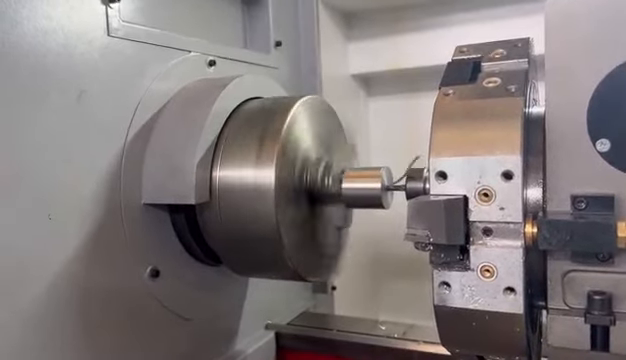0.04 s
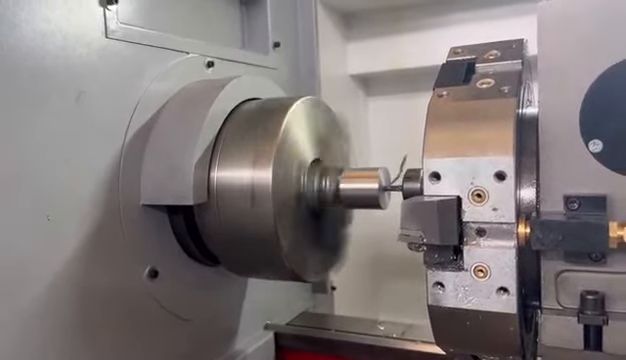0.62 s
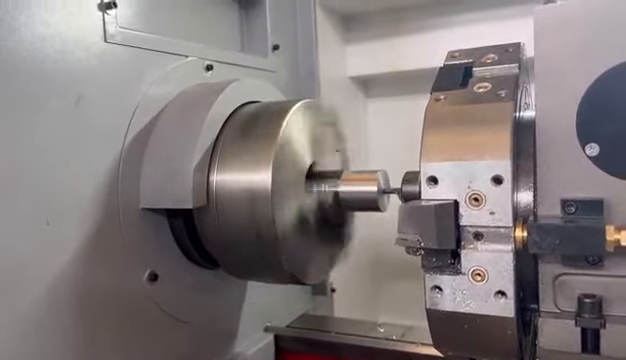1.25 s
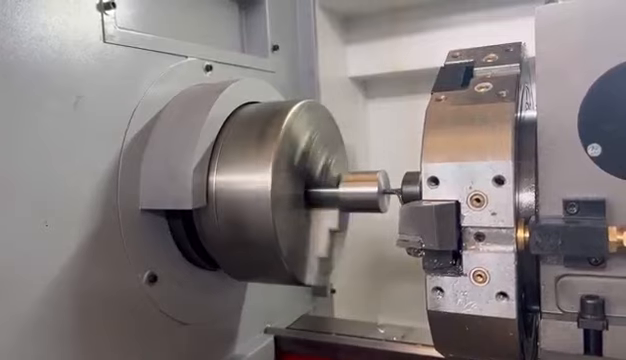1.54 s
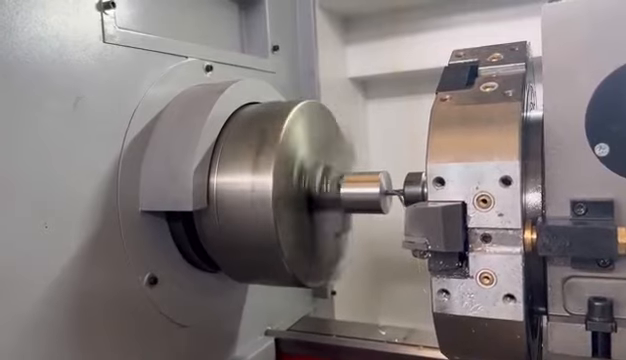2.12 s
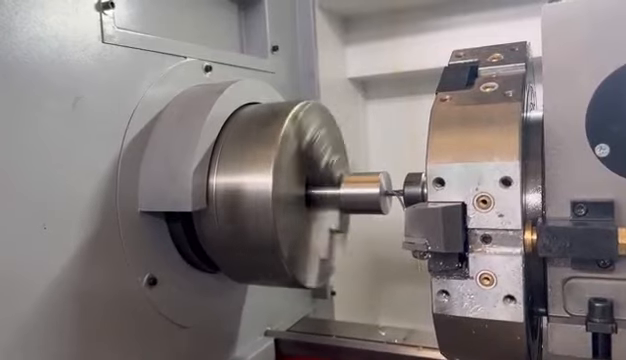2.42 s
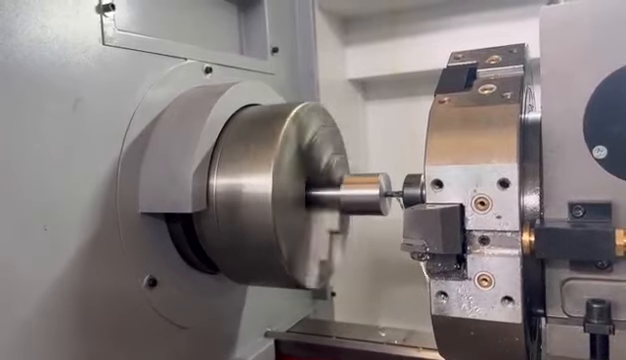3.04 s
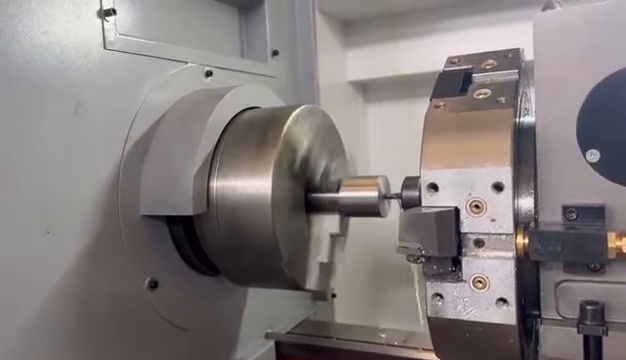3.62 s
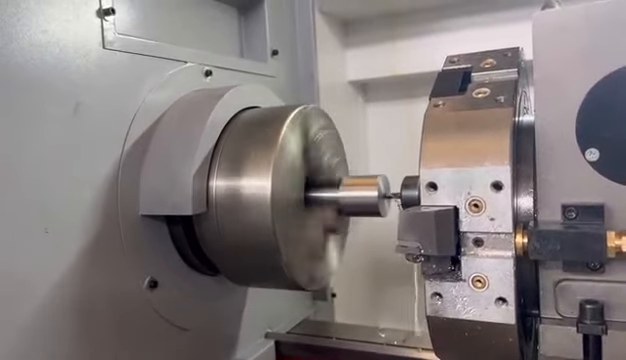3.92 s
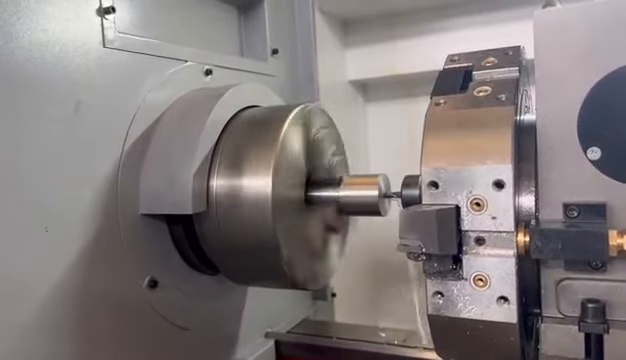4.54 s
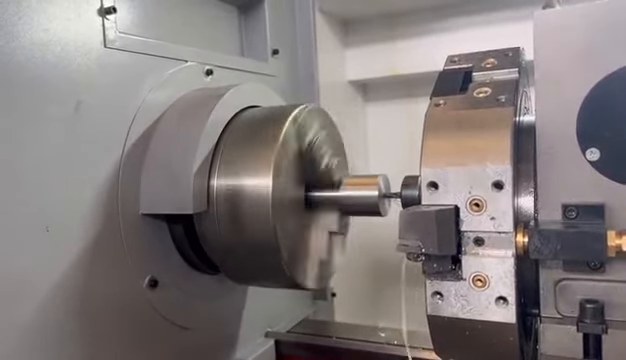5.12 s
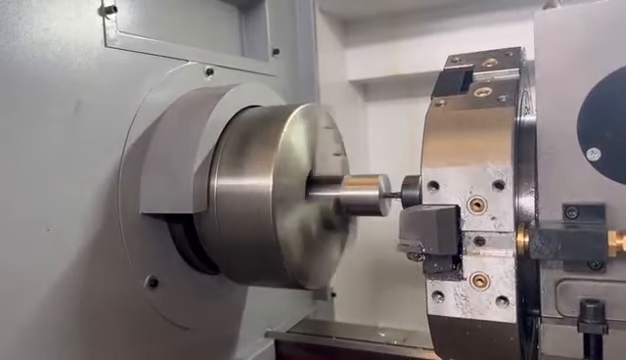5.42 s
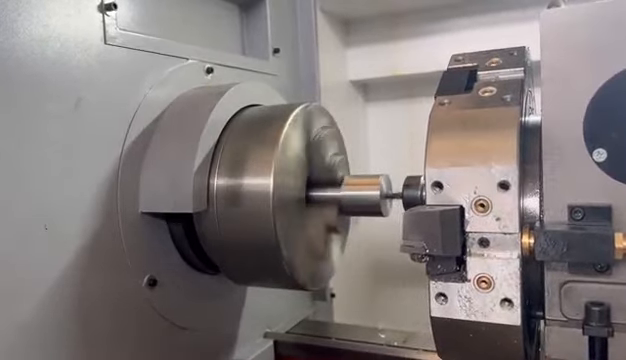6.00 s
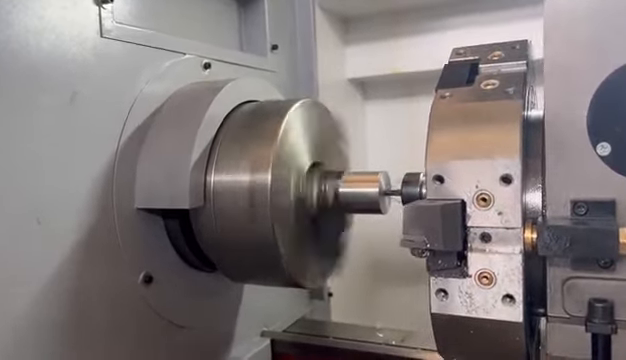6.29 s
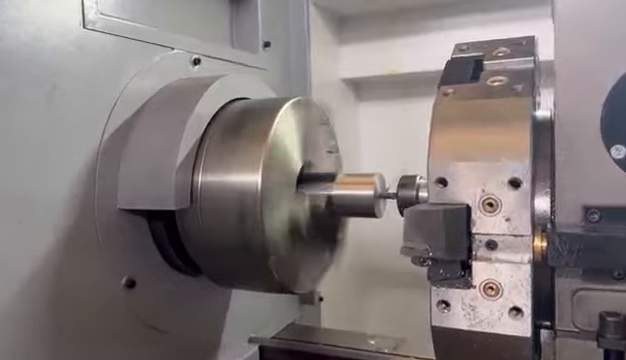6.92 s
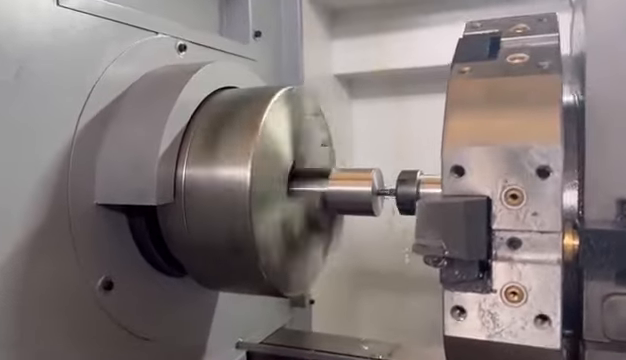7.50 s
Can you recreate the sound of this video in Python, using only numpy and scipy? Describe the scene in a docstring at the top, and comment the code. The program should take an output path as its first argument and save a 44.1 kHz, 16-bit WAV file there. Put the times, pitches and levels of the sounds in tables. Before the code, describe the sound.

Close, steady whine of a running lathe, with a rapid growling churn, a thin high motor whistle and a rush of fans.

```python
"""A lathe's toothed belt whines and whirs as it drives the spindle at about 500 rpm, heard from close by.
The pattern repeats each spindle turn and each belt lap; tight spots make the sheet-metal housing growl.
The inverter sings in the motor windings near 6 kHz. Fans and pumps hum over a steady rush behind it,
and a low throb of the machine body swells for a few seconds in the middle."""
import sys
import numpy as np
from scipy import signal
from scipy.fft import rfft, irfft
from scipy.io import wavfile
from scipy.ndimage import uniform_filter1d

SR = 44100
rng = np.random.default_rng(int(sys.argv[2]) if len(sys.argv) > 2 else 0)


def generate_wav(signal):
    """Clip the signal to [-1, 1] and save it as 16-bit WAV at the path in sys.argv[1]."""
    frames = np.transpose(np.atleast_2d(signal))
    scaled = np.clip(frames, -1, 1) * 32767
    pcm = np.round(scaled).astype(np.int16)
    wavfile.write(sys.argv[1], SR, pcm)


N = 341775
TIME = np.arange(N) / SR

SPIN_HZ, TEETH, BELT_LAP_HZ = 8.4101, 110, 2.182
RING_MULTIPLE = 3  # of half the mesh rate

# Swell of the ring above the whine. Each row: time in seconds, level in dB (used about its mean).
RING_LEVEL_DB = [(0, -47), (.9, -43.5), (1.7, -44.5), (3.3, -45.5), (3.95, -44), (4.25, -42.5),
                 (4.75, -44.5), (5.1, -45), (5.7, -45), (6.2, -42.5), (6.7, -39), (7.03, -41.5), (7.3, -38),
                 (7.75, -40)]


def whine(turns, gain_db=0.71, flaw_at_turns=0.6, sway=0.033, sway_at_turns=0.091, stray_db=-41):
    """The tooth mesh sags at one uneven spot each turn and eases twice in each lap of the belt."""
    # The microphone drifts through standing waves.
    # Each row: time in seconds, left and right level in dB before gain_db, left phase lead in rad.
    standing_waves = [(0, -18.5, -37, 2.5), (1.8, -18.5, -34.5, 4), (2.5, -19.5, -38, 0),
                      (3.6, -19, -39.5, 5), (5.5, -18.5, -32.5, 2.1), (6.2, -19.5, -38, 1),
                      (6.9, -22, -42, -2), (7.5, -21, -26.5, -0.5), (7.75, -24.5, -24.5, -0.5)]
    # The belt's stiff stretch rounds each pulley. Each row: place in laps, length in laps, easing depth.
    pulleys = [(.25, 0.21, 0.12), (.84, 0.21, 0.043)]
    # Brief level changes, mostly dips. Each row: centre in seconds, length in seconds, gain in dB.
    dips = [(3.8, 0.25, -3), (4.758, 0.36, -2), (6.972, 0.12, 0.5)]
    sag_turns, recover_turns, sag_depth, lurch_rad = .026, .014, .15, .12
    past_turns = offset(turns, flaw_at_turns)
    flaw = np.exp(-(past_turns / np.where(past_turns < 0, sag_turns, recover_turns)) ** 2)
    flaw *= 1 + 0.13 * drift(rate_hz=6.8)
    cycles = TEETH * turns + (belt_slip_rad() + lurch_rad * flaw) / (2 * np.pi)
    mesh = tone(cycles, *(curve(standing_waves, column) for column in (1, 2, 3)))
    easing = sum(depth * passing(BELT_LAP_HZ * TIME, at, length) for at, length, depth in pulleys)
    belt_ripple = (easing - easing.mean()) * mesh[0]  # same at both ears
    reflections = np.array([drift(rate_hz=3.3) + 1j * drift(rate_hz=3.2) for ear in range(2)])
    stray = reflections * tone(cycles, stray_db, stray_db, lead_rad=0) / np.sqrt(2)
    per_turn = (1 - sag_depth * flaw) * (1 + sway * np.cos(2 * np.pi * (turns - sway_at_turns)))
    dip_db = sum(db * bump(at_s, length_s) for at_s, length_s, db in dips)
    return gain_of(gain_db + dip_db) * per_turn * (mesh - belt_ripple + stray).real


def belt_slip_rad(depth_rad=0.15, at_laps=0.21, length_laps=0.44):
    """The stiff stretch of the belt pulls the mesh slightly ahead once a lap."""
    return depth_rad * passing(BELT_LAP_HZ * TIME, at_laps, length_laps)


def ring(turns, warble_rad=.8, warble_at_turns=.85, steadying_rad_per_db=.08):
    """A fifth above the whine, the mesh throbs with the chuck; it warbles less as it grows louder."""
    depth_rad = warble_rad - steadying_rad_per_db * swing_db(RING_LEVEL_DB)
    warble = depth_rad * np.cos(2 * np.pi * (turns - warble_at_turns))
    cycles = RING_MULTIPLE * TEETH / 2 * turns + (warble + 2 * belt_slip_rad()) / (2 * np.pi)
    partial = tone(cycles, left_db=-41, right_db=-43.5, lead_rad=1.51)
    return (partial * ring_swell(turns) * fading(share=.14, rate_hz=8)).real


def ring_swell(turns, gain_db=2.5, beat_db=1.5, loudest_at_turns=0.22):
    """Gain of the ring: it drops briefly once a turn and beats on every second turn."""
    db = gain_db + swing_db(RING_LEVEL_DB) + beat_db * np.cos(np.pi * (turns - loudest_at_turns))
    return gain_of(db) * (1 - .85 * passing(turns, at=.645, length=.25))


def overtones(turns):
    """Higher mesh partials, chopped and warbled by the chuck; the ring's octave follows the ring."""
    # Each row: multiple of half the mesh rate, left and right base level in dB,
    # left phase lead in rad, warble depth in rad.
    mesh_partials = [(4, -46.5, -47, -2.5, .25), (6, -56, -58.5, 1.85, 0.69), (7, -61, -66, 2, 1.1),
                     (8, -56.5, -58.5, 2, 1.1), (9, -63.5, -61, -0.8, 1), (10, -63, -70, 5, 1)]
    # The others recede as the microphone leans in. Each row: time in seconds, gain in dB.
    recession = [(0, 0.5), (3, 0), (6.2, -1.5), (7, -2.5), (7.75, -3)]
    slip_cycles = belt_slip_rad() / np.pi
    ringing, receding = ring_swell(turns), gain_of(curve(recession))
    out = np.zeros((2, N))
    for multiple, *ears, warble_rad in mesh_partials:
        scatter = chopping(turns, depth=.04 * multiple) * fading(share=.06 * multiple, rate_hz=18)
        warble = np.exp(1j * warble_rad * np.sin(2 * np.pi * (turns + rng.random())))
        partial = tone(multiple * TEETH / 2 * turns + slip_cycles, *ears) * scatter * warble
        out += (partial * (ringing if multiple == 2 * RING_MULTIPLE else receding)).real
    return out


def chopping(turns, depth, count=4):
    """The passing jaws scatter a tone in the same way on every turn."""
    ripple = np.exp(2j * np.pi * rng.random((2, count))) * (np.arange(count) > 0)
    level, phase = (unit_rms(each_turn(turns, row).real) for row in ripple)
    return (2 + depth * (level + 1j * phase)) / np.sqrt(1 + 2 * depth ** 2)


def growls(turns):
    """Tight spots in the drive set the housing ringing on every turn, never twice quite alike."""
    # Each row: angle in turns, pitch in Hz, glide in Hz per turn, length in turns,
    # left and right base level in dB, left phase lead in rad.
    tight_spots = [(0.076, 674, 330, 0.25, -31, -34, .77), (.47, 711, -450, .18, -29.5, -33, 1),
                   (0.608, 842.4, 0, 0.37, -33, -32.5, 1), (0.614, 780, 0, 0.021, -18.5, -28, 0.65),
                   (.62, 1117, 300, .16, -41, -49, 1), (.71, 800, 0, 0.1, -32, -41, .8),
                   (.85, 763, 0, 0.16, -40.5, -37, 0.72)]
    out = np.zeros((2, N))
    for angle, hz, glide, length, *ears in tight_spots:
        past_turns = offset(turns, angle)
        cycles = (hz + glide * past_turns / 2) * past_turns / SPIN_HZ + TEETH * angle + .5
        ringing = tone(cycles, *ears) * fading(share=.22, rate_hz=25)
        out += ringing.real * passing(turns, angle, length)
    return out


def whir(turns, right_bed_db=-1.0, scatter_db=2.5, count=360):
    """Small errors from tooth to tooth repeat every turn: a dense comb of partials."""
    # Each row: multiple of spindle speed, left and right base level in dB, left phase lead in rad.
    strong_partials = [(10, -54, -54, 0), (43, -50, -50, .3), (47, -52, -62, .1), (57, -55, -51, 1),
                       (61, -51, -51, .8), (79, -52, -55, .2), (86, -51, -51, 1), (90, -48, -40.3, -.3),
                       (91, -51, -58, .1), (109, -55, -43, 1.8)]
    # Weaker partials between them. Each row: frequency in Hz, base level per partial in dB.
    bed = [(60, -78), (300, -58.5), (450, -51), (570, -57), (700, -63), (860, -65), (925, -54.5),
           (990, -54), (1200, -63), (1600, -63.5), (3000, -73.5)]
    hz = np.arange(count) * SPIN_HZ
    bed_db = spectrum(bed, hz) + scatter_db * rng.standard_normal((2, count))
    bed_db[1] += right_bed_db
    partials = gain_of(bed_db) * np.exp(2j * np.pi * rng.random((2, count)))
    partials[:, hz < bed[0][0]] = 0
    for order, left_db, right_db, lead_rad in strong_partials:
        phase_rad = 2 * np.pi * rng.random() + np.array([lead_rad, 0])
        partials[:, order] = gain_of([left_db, right_db]) * np.exp(1j * phase_rad)
    comb = np.array([each_turn(turns, ear) for ear in partials])
    return np.sqrt(2) * (comb * fading(share=0.34, rate_hz=6.9)).real


def drone(turns):
    """Two low partials of the whir stand in the enclosure and grow as the microphone leans in."""
    # Each row: multiple of spindle speed, left and right base level in dB, left phase lead in rad.
    partials = [(75, -48, -51, .5), (90, -52, -48, -.3)]
    # Each row: time in seconds, gain in dB.
    swell = [(0, -4), (4.6, -18), (6, -5), (7.4, 9)]
    wave = sum(tone(order * turns + rng.random(), *ears) * fading(share=0.22, rate_hz=5.4)
               for order, *ears in partials)
    return gain_of(curve(swell)) * wave.real


def inverter(carrier_hz=6000.2, supply_hz=28.68, gain_db=-1.0):
    """The motor windings sing at sidebands of the switching frequency; the strongest take turns."""
    # Each row: offset in multiples of supply_hz, left and right base level in dB, left phase lead in rad.
    sidebands = [(-11, -61, -68, 1), (-5, -56, -60, 1), (-3, -60.5, -57.5, -1), (-1, -52, -50.5, -.7),
                 (1, -51.5, -54, -.7), (3, -58, -58, -1), (5, -57, -60, .4), (7, -64, -69, .9)]
    # Each row: time in seconds, levels of sidebands -1 and +1 in dB (used about their means).
    inner_levels = [(0, -53, -51), (.9, -57, -57), (1.6, -58, -53), (2.35, -48.5, -54), (3.0, -47, -55),
                    (3.6, -54, -60), (4.25, -52, -54), (4.6, -55, -47), (5.2, -56, -47), (5.5, -52, -52),
                    (6.1, -51, -48), (6.65, -47, -54), (6.95, -52.5, -53), (7.15, -47, -52),
                    (7.75, -48, -55)]
    # Each row: time in seconds, level of sideband +3 in dB (used about its mean).
    upper_level = [(0, -53), (1.05, -52), (1.6, -55), (6.4, -60), (6.8, -48), (7.05, -52), (7.45, -50),
                   (7.75, -51)]
    own_db = {1: swing_db(inner_levels, column=2), 3: swing_db(upper_level)}
    out = np.zeros((2, N))
    for k, *ears in sidebands:
        cycles = (carrier_hz + k * supply_hz) * TIME + k ** 2 / 42  # staggered phases
        db = own_db.get(k, swing_db(inner_levels) / np.sqrt(abs(k)))
        out += gain_of(db) * (tone(cycles, *ears) * fading(share=.14, rate_hz=7)).real
    return gain_of(gain_db) * out


def whistle(hz=5631.3, beat_hz=3.82, beat_at_s=2.45, beat_share=.45):
    """Two thin electronic tones just under the inverter's song beat slowly against each other."""
    # Each row: time in seconds, gain in dB.
    swell = [(0, 10), (2.7, 10.5), (4.9, 4.5), (7.75, 9)]
    beat = 1 + beat_share * np.exp(-2j * np.pi * beat_hz * (TIME - beat_at_s))
    pair = tone(hz * TIME, left_db=-55.5, right_db=-60.0, lead_rad=2.4) * beat
    return gain_of(curve(swell)) * (pair * fading(share=.16, rate_hz=9.8)).real


def throb(hz=65.6, idle_db=-54, held_db=-50.5, surge_gain_db=2, stretch=1.1):
    """A low vibration of the machine body builds up from a faint idle, surges unevenly and dies away."""
    # Each row: start in seconds, length in seconds before stretch, level in dB before surge_gain_db.
    surges = [(1.46, .135, -38), (1.755, .06, -41.5), (1.955, .125, -38), (2.185, .11, -36.3),
              (2.37, .08, -42.5), (2.556, .17, -39), (2.82, .08, -45.5), (2.975, .23, -38.3),
              (3.25, .08, -43), (3.356, .25, -38.7), (3.86, .21, -42.5), (4.245, .115, -38),
              (4.62, .09, -44.5)]
    # Brief stalls. Each row: centre in seconds, length in seconds, gain in dB.
    lulls = [(3.718, 0.11, -18), (4.8, .1, -10)]
    start_s, end_s, fade_s = 1.1, 4.6, 0.4
    cycles = hz * TIME + 0.13 * drift(rate_hz=1.5)
    held = np.clip(np.minimum(TIME - start_s, end_s - TIME) / fade_s + .5, 0, 1)
    bed = (gain_of(idle_db) + gain_of(held_db) * held) * abs(fading(share=0.25, rate_hz=7.2))
    surging = sum(gain_of(db + surge_gain_db) * bump(at_s + length_s / 2, stretch * length_s)
                  for at_s, length_s, db in surges)
    stall = gain_of(sum(db * bump(at_s, length_s) for at_s, length_s, db in lulls))
    return np.sqrt(2) * np.hypot(bed, surging) * stall * np.sin(2 * np.pi * cycles)


def pump(hz=461.22, beat_at_s=.59, beat_share=0.34):
    """The pump's hum beats slowly against the drive's partial at half the mesh rate."""
    # Each row: time in seconds, gain in dB.
    swell = [(0, 2), (1.35, 2), (2.2, 1), (3.65, 0), (4.3, 0.5), (5.1, 1.5), (5.7, -1), (6.6, -0.5),
             (7.6, -0.5)]
    beat_hz = TEETH / 2 * SPIN_HZ - hz
    beat = 1 + beat_share * np.exp(2j * np.pi * beat_hz * (TIME - beat_at_s))
    hum = tone(hz * TIME + 0.12 * drift(rate_hz=0.71), left_db=-46.0, right_db=-40.5, lead_rad=0)
    return gain_of(curve(swell)) * (hum * beat).real


def hums():
    """Fans, pumps and electronics hum at their own pitches, each tone wavering a little."""
    # Each row: frequency in Hz, left and right level in dB, left phase lead in rad.
    tones = [(82.8, -56, -56, 0), (240.2, -53, -53, -.2), (246.5, -54, -55, 0), (300, -55, -54, .3),
             (302.5, -55, -53, 0), (329.3, -55, -51, .6), (386, -50.5, -50, .5), (470.8, -56, -52, 1),
             (527.2, -40.5, -51.5, -.1), (1251, -52, -56, 2), (2261, -60, -63, -3), (3343.4, -59, -63, 2.8),
             (5168, -61, -68, -.5), (5799.5, -58, -68, -1.5), (6369.5, -63, -69, .6),
             (6541.4, -58, -65, 2.1)]
    return sum((tone(hz * TIME + rng.random(), *ears) * fading(share=0.25, rate_hz=3.2)).real
               for hz, *ears in tones)


def rush(turns, swish_db=.7, swish_at_turns=0.8, treble_flicker_db=2.2, upper_flicker_db=1.3, size=1024):
    """A steady rush that swishes with each turn, with a slight random flicker in its hiss."""
    # Each row: frequency in Hz, left and right base density in dB per Hz.
    density = [(20, -98, -91), (34.8, -60, -63.5), (60, -71, -68.5), (122, -62.5, -64.5), (278, -70, -67.5),
               (600, -68.5, -68), (654, -56.5, -59), (940, -61.5, -59.5), (1550, -65.5, -69.5),
               (1770, -76.5, -73.5), (2370, -71.5, -70.5), (4380, -77, -79), (5500, -74, -78.5),
               (6000, -72.5, -74), (7680, -89, -88.5), (8140, -83, -83), (11650, -89, -89),
               (14400, -99.5, -99.5)]
    # Each row: frequency in Hz, correlation between the ears.
    likeness = [(60, 0.94), (130, 1), (260, 1), (500, 0.49), (1000, -0.37), (2000, 0.39), (5500, -0.09),
                (7500, 0.7), (14000, 0.7)]
    hz, frames = np.fft.rfftfreq(size, 1 / SR), np.arange(0, N + size, size // 4)
    a, b, c, d, flicker = rng.standard_normal((len(frames), len(hz), 5)).T
    correlation = np.clip(spectrum(likeness, hz), -1, 1)[:, None]
    common = (a + 1j * b) * np.sqrt((1 + correlation) / 2)
    apart = (c + 1j * d) * np.sqrt((1 - correlation) / 2)
    bins = np.array([(common + apart) * gain_of(spectrum(density, hz, column=1))[:, None],
                     (common - apart) * gain_of(spectrum(density, hz, column=2))[:, None]])
    flicker = uniform_filter1d(flicker, size=12, axis=0)  # across frequency
    flicker = unit_rms(uniform_filter1d(flicker, size=26, axis=1))  # across time
    swish = np.cos(2 * np.pi * (np.interp(frames, np.arange(N), turns) - swish_at_turns))
    treble, upper = ((hz ** 2 / (hz ** 2 + corner_hz ** 2))[:, None] for corner_hz in (5000, 1500))
    flicker_db = (treble ** 2 * treble_flicker_db + upper * upper_flicker_db) * flicker
    bins *= gain_of(treble * swish_db * swish + flicker_db)
    density_scale = np.sqrt(1.5 * SR / size)
    return density_scale * signal.istft(bins, nperseg=size, noverlap=size - size // 4)[1][:, :N]


def grit(knocks_per_s=110, spread_db=3.5):
    """Tiny uneven knocks in the bearings, each ringing the housing for a few milliseconds."""
    # Each row: frequency in Hz, decay time in seconds, base rms level in dB.
    housing_modes = [(2240, 0.0033, -57), (2540, .003, -54), (2736, .0025, -55.5)]
    t, out = np.arange(1024) / SR, np.zeros((2, N))
    for hz, decay_s, db in housing_modes:
        hits = rng.random(N) < knocks_per_s / SR
        knocks = hits * gain_of(spread_db * np.minimum(rng.exponential(1, N), 2))
        for ear in out:
            mode = np.exp(-t / decay_s) * np.sin(2 * np.pi * (hz * t + rng.random()))
            ear += gain_of(db) * unit_rms(signal.oaconvolve(knocks, mode)[:N])
    return out


def scuffs():
    """Short, soft swells of narrow noise."""
    # Each row: centre in seconds, frequency in Hz, width in Hz, length in seconds, level in dB.
    swells = [(2.022, 2050, 650, .032, -41.5), (5.0, 248, 28, .5, -45.5), (5.21, 190, 45, .13, -47)]
    hz, out = np.fft.rfftfreq(N, 1 / SR), np.zeros(N)
    for at_s, centre_hz, width_hz, length_s, db in swells:
        passband = np.exp(-2 * ((hz - centre_hz) / width_hz) ** 2)
        band = irfft(rfft(rng.standard_normal(N)) * passband, N)
        out += gain_of(db) * unit_rms(band) * bump(at_s, length_s)
    return out


def tone(cycles, left_db, right_db, lead_rad):
    """A complex partial at the two ears, the left leading in phase."""
    wave = np.sqrt(2) * np.exp(2j * np.pi * cycles)
    return np.array([wave * gain_of(left_db), wave * gain_of(right_db) * np.exp(-1j * lead_rad)])


def fading(share, rate_hz):
    """Complex gain of direct sound plus reflections whose sum keeps shifting."""
    return (1 + share * (drift(rate_hz) + 1j * drift(rate_hz))) / np.sqrt(1 + 2 * share ** 2)


def drift(rate_hz, size=2048):
    """Slow random wander of rms 1, rolling off above rate_hz."""
    hz = np.fft.rfftfreq(size, N / SR / size)
    slow = irfft(rfft(rng.standard_normal(size)) * (hz > 0) / (1 + (hz / rate_hz) ** 2))
    return np.interp(TIME, np.linspace(0, TIME[-1], size), unit_rms(slow))


def each_turn(turns, partials, size=8192):
    """Complex partials 0, 1, 2.. of the spindle speed, as a pattern locked to its angle."""
    return np.interp(turns % 1, np.arange(size) / size, size * np.fft.ifft(partials, size))


def offset(cycles, at):
    """Signed distance in cycles from the nearest pass of one spot."""
    return (cycles - at + .5) % 1 - .5


def passing(cycles, at, length):
    """A smooth rise and fall each time one spot comes round."""
    return np.exp(-(2 * offset(cycles, at) / length) ** 2)


def bump(centre_s, length_s):
    """A smooth rise and fall around one moment."""
    return np.exp(-(2 * (TIME - centre_s) / length_s) ** 2)


def curve(rows, column=1):
    """One column of a time table, at every sample."""
    table = np.array(rows)
    return np.interp(TIME, table[:, 0], table[:, column])


def swing_db(rows, column=1):
    """A level curve about its own mean."""
    db = curve(rows, column)
    return db - db.mean()


def spectrum(rows, hz, column=1):
    """One column of a frequency table, interpolated on a log axis."""
    table = np.array(rows)
    return np.interp(np.log(hz + 1), np.log(table[:, 0] + 1), table[:, column])


def gain_of(db):
    """Decibels to amplitude."""
    return 10 ** (np.asarray(db) / 20)


def unit_rms(x):
    """Scales to rms 1."""
    return x / np.sqrt(np.mean(abs(x) ** 2) + 1e-20)


def scene():
    """Everything on the spindle follows its angle, which the servo holds almost steady."""
    # The microphone leans in near the end. Each row: time in seconds, gain of the churn in dB.
    nearness = [(0, -2.5), (2.3, -2.5), (4.6, -3), (6.3, -2.5), (7, -2.5), (7.75, -1)]
    turns = SPIN_HZ * TIME + 0.000037 * drift(rate_hz=1.4)
    churn = (growls(turns) + whir(turns) + rush(turns) + grit()) * gain_of(curve(nearness))
    drive = whine(turns) + ring(turns) + overtones(turns) + churn + drone(turns)
    return drive + hums() + pump() + inverter() + whistle() + throb() + scuffs()


def record(dry, low_cut_hz=44, high_cut_hz=15150):
    """The microphone's low cut, then a steep band limit."""
    thinned = signal.sosfilt(signal.butter(2, low_cut_hz, "highpass", fs=SR, output="sos"), dry)
    band_limit = signal.firwin(511, high_cut_hz, window=("kaiser", 9), fs=SR)
    return signal.oaconvolve(thinned, band_limit[None], "same")


dry = scene()
out = record(dry)
generate_wav(out)
```